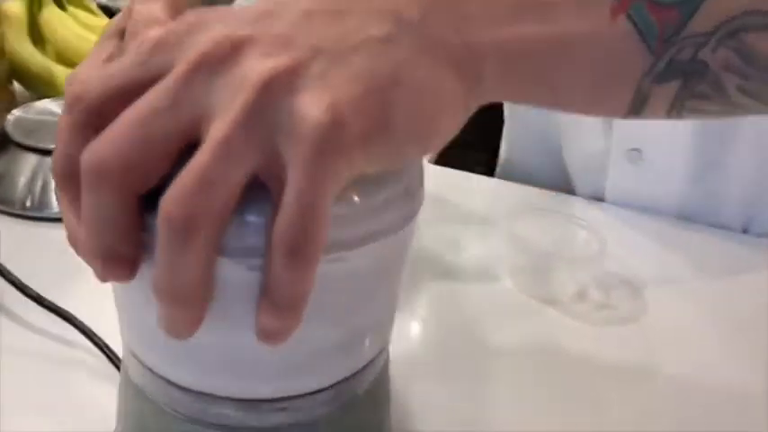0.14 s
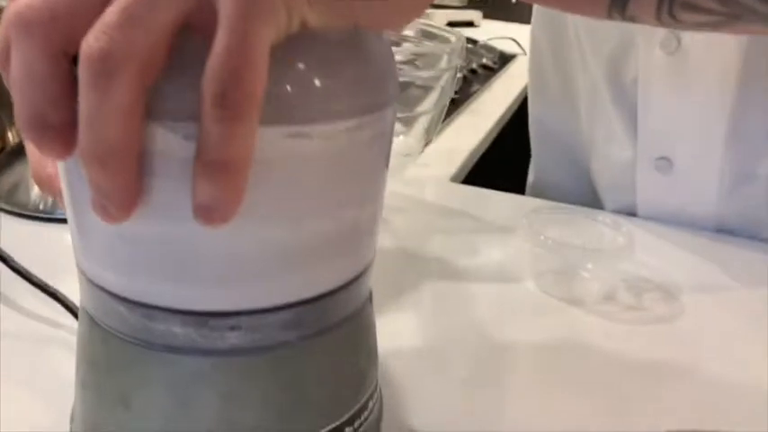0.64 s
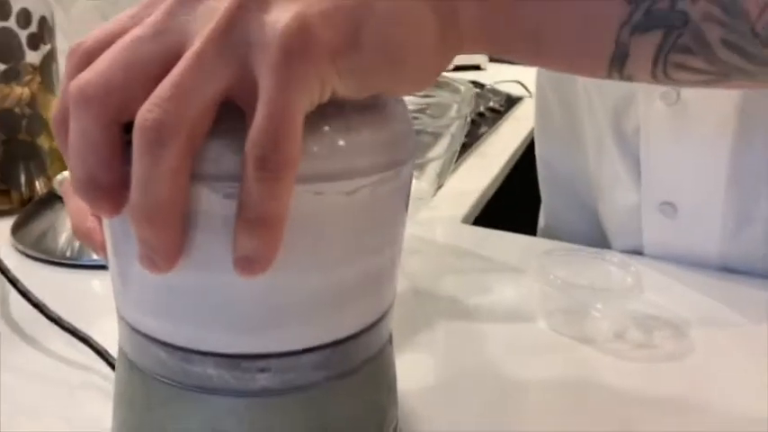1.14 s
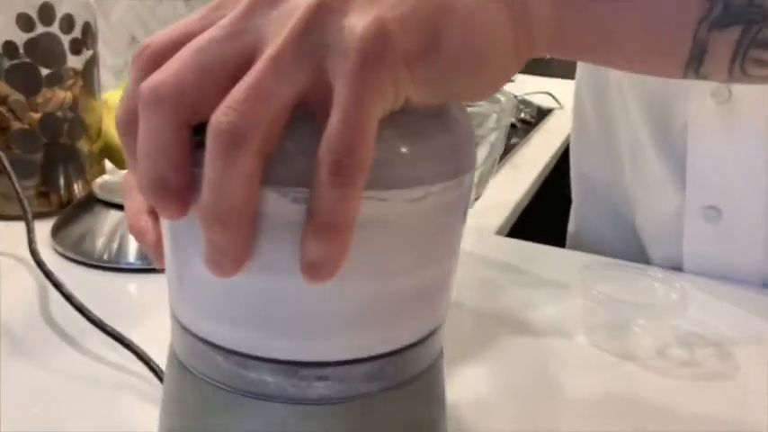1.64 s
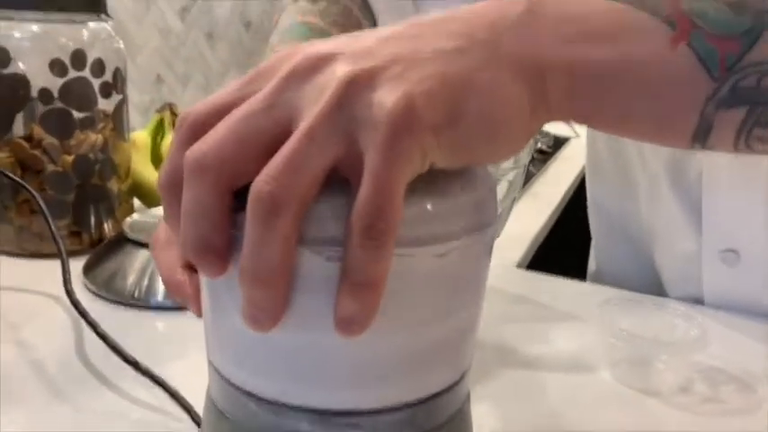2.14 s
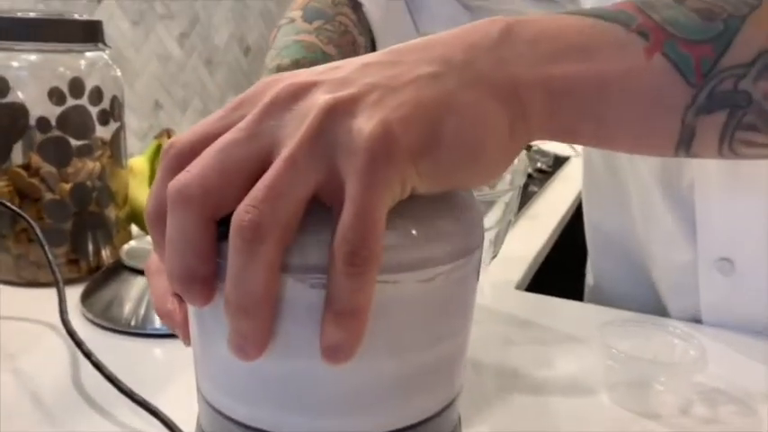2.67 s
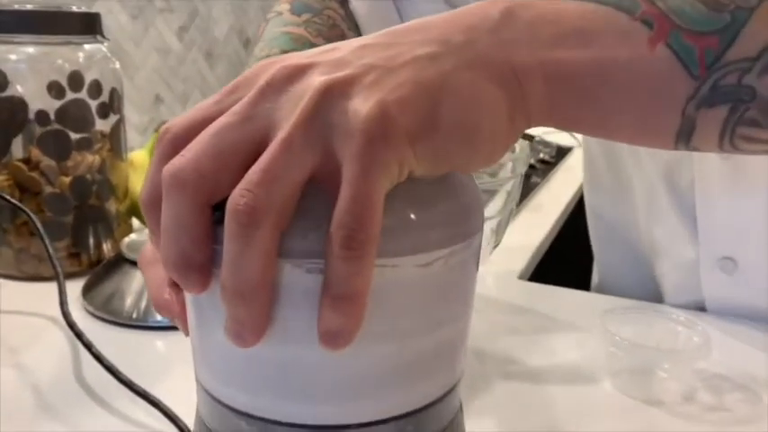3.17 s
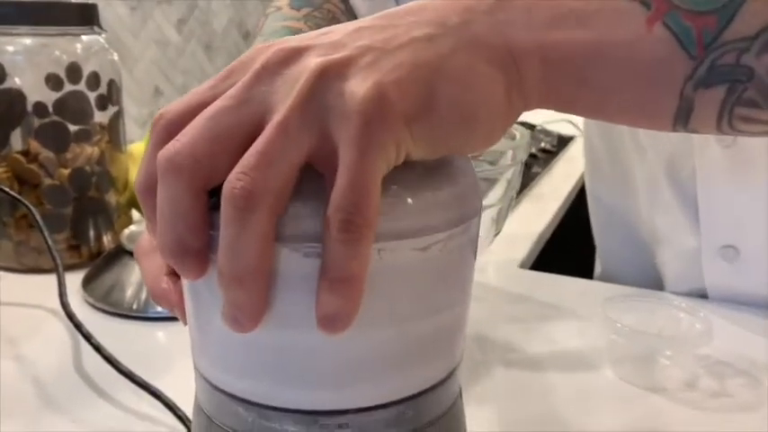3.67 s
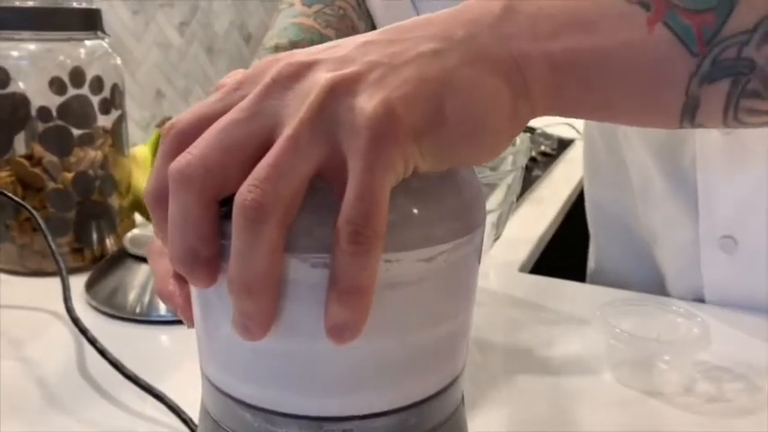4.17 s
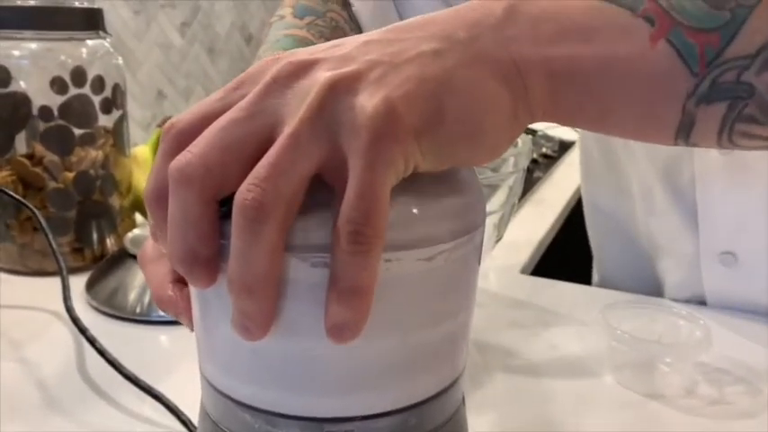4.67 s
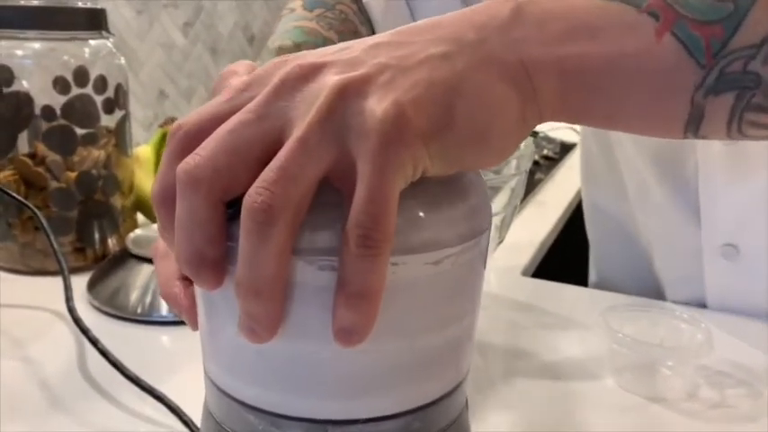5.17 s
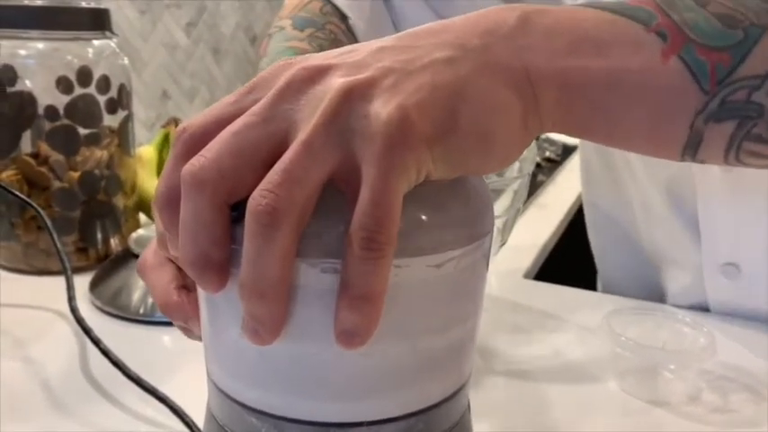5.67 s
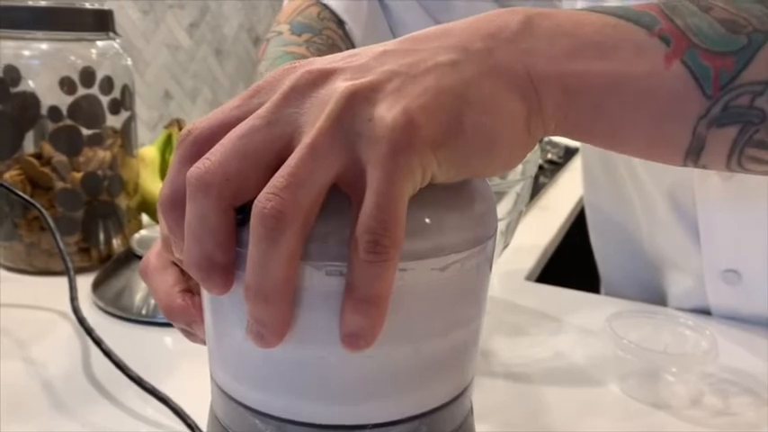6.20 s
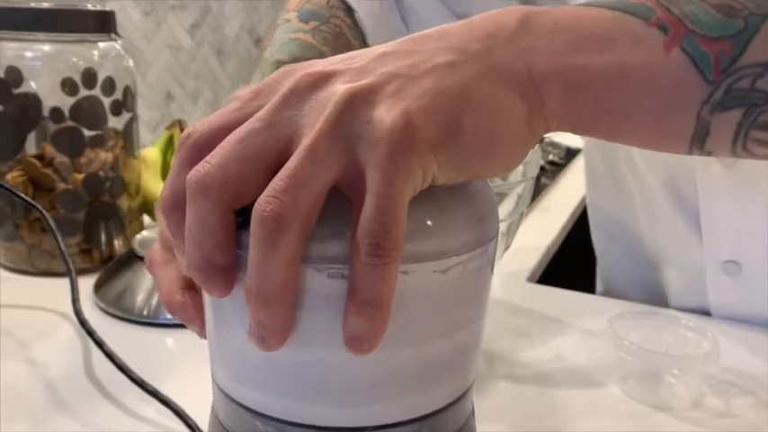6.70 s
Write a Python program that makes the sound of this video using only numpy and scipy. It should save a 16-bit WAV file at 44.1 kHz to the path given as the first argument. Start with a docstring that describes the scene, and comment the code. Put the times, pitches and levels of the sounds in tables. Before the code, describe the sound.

Close, centred sound of a small electric food chopper on a kitchen counter, with faint room air and a short bright reverberation. It starts at full speed but is let go at about 0.05 s, and the whine slides down, roughening into a coarser, duller clatter. At 0.4 s a tiny tick and near-instant spin-up begin a loud, harsh whine with gritty tooth rattle, fast fluttering and low hum, held until 1.3 s. It coasts down, then runs again from 1.7 to 2.6 s, 3.0 to 3.8 s, 4.2 to 5.0 s and 5.4 to 6.6 s, the last longest and slightly loudest. Within each run the pitch starts a little lower under the food's load, then lifts and wavers. Soft low jolts accompany the releases, strongest near 3.9 s. After 6.6 s the final glide falls away towards the end.

```python
"""A small geared food chopper, already running, is let go almost at once; five longer pulses follow.
Each press ticks and spins up, the blade works through thick food, a jolt marks the release, and it coasts down.
Tooth contact gives whine partials at the mesh rate and noisy knocks, coloured by housing resonances.
Low noise and hum shake the counter; random reflections add a short tail, over quiet kitchen air."""
import sys
import numpy as np
from scipy import signal
from scipy.fft import rfft, irfft
from scipy.io import wavfile
from scipy.ndimage import uniform_filter1d

SR = 44100
rng = np.random.default_rng(int(sys.argv[2]) if len(sys.argv) > 2 else 0)


def output_pcm(signal):
    """Save a mono or channel-first signal as 16-bit PCM at the path in sys.argv[1].

    Samples are clipped to [-1, 1] before scaling.
    """
    pcm = np.clip(np.atleast_2d(signal).T, -1, 1) * 32767
    wavfile.write(sys.argv[1], SR, np.round(pcm).astype(np.int16))


def makeup_ratio(level_db):
    """Linear amplitude ratio for a level in decibels (20 dB per factor of ten)."""
    decades = np.asarray(level_db, float) / 20
    return 10 ** decades


N = 300762
T = np.arange(N) / SR  # time of each sample, s
FULL_HZ = 2950  # nominal mesh rate at full speed
TEETH = 64  # teeth on the blade gear
EDGE_HZ = 15770  # upper edge of the sound's band
SLACK_S = 0.009  # time in which the teeth take up slack

# presses of the switch: on_s, off_s, food_drag_per_s, gear_trim_db, shake_trim_db
PRESSES = [(-0.5, 0.047, 4.4, 0, 4), (0.416, 1.337, 4.45, -0.6, 2), (1.694, 2.633, 3.53, -0.65, 0.5),
           (2.96, 3.84, 4.01, -0.3, 0), (4.199, 4.986, 3.6, -0.3, -1), (5.394, 6.628, 3.27, 0.36, -0.5)]


def evened(x):
    """Normalisation: scales to rms 1."""
    return x / np.sqrt(np.mean(x ** 2) + 1e-20)


def read(points, hz):
    """Spectral envelope: interpolates its points along a log-frequency axis."""
    f, value = np.transpose(points)
    return np.interp(np.log(hz + 1), np.log(f + 1), value)


def curve(table, column, at=T):
    """Linear interpolation: one column of a table against its first column."""
    points = np.array(table)
    return np.interp(at, points[:, 0], points[:, column])


def wander(hz):
    """Low-pass filtered chance: a smooth fluctuation of rms 1, with its corner at hz."""
    return evened(signal.lfilter(*signal.butter(2, hz, fs=SR), rng.standard_normal(N)))


def shaped_noise(shape, size, patchy_db):
    """Short-time synthesis: random spectra under shape(hz, s), levelled by frame, then given drifting patches."""
    hop = size // 4
    frames = N // hop + 5
    hz = np.fft.rfftfreq(size, 1 / SR)[:, None]
    real, imaginary, patches = rng.standard_normal((frames, len(hz), 3)).T
    patches = uniform_filter1d(patches, size // 64, 0)
    patches = evened(uniform_filter1d(patches, 2560 // hop, 1))
    gain = shape(hz, np.arange(frames) * hop / SR) * np.ones(frames)
    gain = gain / np.sqrt((gain ** 2).mean(0)) * makeup_ratio(patchy_db * patches)
    noise = signal.istft((real + 1j * imaginary) * gain, nperseg=size, noverlap=size - hop)[1]
    return evened(noise[:N])


def body(hz):
    """Modal response: gain of the housing, its broad colour and its resonances adding in power."""
    # broad colour of the housing: frequency_hz, gain_db
    broad_colour = [(400, -43), (620, -48), (850, -20), (1050, -12.5), (1800, -5), (3100, -18.5),
                    (3500, -8.5), (4600, -1.5), (5600, -3.5), (7300, -3), (9000, -3), (12500, -3),
                    (15500, -6), (17000, -1)]
    # resonances of housing and bowl: frequency_hz, width_hz, gain_db
    resonances = [(770, 32, -33), (1154, 58, -1.5), (1508, 390, -2), (2038, 51, -1), (2250, 120, -7.5),
                  (2484, 240, -5.5), (2940, 290, -2), (3205, 240, -5.5), (3918, 170, 4), (4183, 150, 3.5),
                  (5345, 90, -1), (5888, 90, 1), (6350, 870, -0.5), (8280, 450, -3), (9830, 320, 5.5),
                  (11000, 1300, -5), (14000, 540, -3.5)]
    peaks = sum(makeup_ratio(2 * db) / (1 + (2 * (hz - f) / width) ** 2) ** 2 for f, width, db in resonances)
    return np.sqrt(makeup_ratio(2 * read(broad_colour, hz)) + peaks)


def through_body(x):
    """Linear filtering: colours a sound by the housing, at unit mean power gain."""
    gain = body(np.fft.rfftfreq(N, 1 / SR))
    return irfft(rfft(x) * evened(gain), N)


def kitchen_air():
    """Stationary broadband noise: the quiet air of the kitchen."""
    # spectrum of the air: frequency_hz, relative_level_db
    air_spectrum = [(20, -35), (33, -8), (45, -3.5), (70, -27), (100, -4.5), (200, -29), (700, -18),
                    (1500, -14), (5000, -26), (9000, -40), (16000, -50)]
    return makeup_ratio(-51.5) * shaped_noise(lambda hz, s: makeup_ratio(read(air_spectrum, hz)), size=2048, patchy_db=2.5)


def kitchen(x):
    """Reverberation: sparse reflections of random sign, each band dying at its own speed."""
    # decay of the kitchen: frequency_hz, t60_s
    decay_times = [(200, 0.55), (1500, 0.25), (5000, 0.59), (14000, 0.32)]
    taps = np.zeros(SR // 2)
    at = np.arange(200, len(taps) - 20, 20)
    taps[at + rng.integers(0, 20, len(at))] = rng.choice([-1., 1.], len(at))
    hz, t, z = signal.stft(taps, SR, nperseg=256)
    fade_db = -60 * t / read(decay_times, hz)[:, None]
    tail = signal.istft(z * makeup_ratio(fade_db), SR, nperseg=256)[1]
    return signal.fftconvolve(x, tail / np.linalg.norm(tail))[:N]


def jolts():
    """Damped oscillation: the counter is pushed and swings back as the switch is let go."""
    # jolts through the counter: start_s, initial_amplitude_db, pitch_hz
    releases = [(1.31, -39, 42.92), (2.64, -42, 42.8), (3.86, -32, 37.8), (5.01, -41, 40), (6.63, -39, 40)]
    out = 0
    for start_s, db, hz in releases:
        t = np.maximum(T - start_s, 0)
        out = out + makeup_ratio(db - 60 * t / 0.14) * np.sin(2 * np.pi * hz * t)  # t60 0.14 s
    return out


def shake(mesh_hz, turns, ripple_turns):
    """Intermodulation: hum where blade turns and torque ripple mix, over a lumpy rumble of the counter."""
    # counter top shaken by the base: frequency_hz, relative_level_db
    counter_spectrum = [(20, -40), (33, -18), (45, -16.5), (75, -18), (120, -6.5), (165, -8), (210, -0.5),
                        (285, -4.5), (340, -13.5), (420, -9), (520, -16.5), (620, -28.5), (900, -26)]
    # hum in the base: times_per_blade_turn, times_torque_ripple, level_db (before fluctuation and speed)
    hum_lines = [(1, 0, -13), (1, 1, -3.5), (1, 2, -4.5), (22, -2, -15.5), (22, -1, -34), (22, 0, -9.5),
                 (25, 0, -5), (32, 0, -21.5), (40, 0, -20), (44, 0, -5.5)]
    rumble = shaped_noise(lambda hz, s: makeup_ratio(read(counter_spectrum, hz)), size=2048, patchy_db=1.4)
    hum = 0
    for k, m, db in hum_lines:
        phase = 2 * np.pi * (round(k) * turns + round(m) * ripple_turns)
        hum = hum + makeup_ratio(db + 2 * wander(6.1)) * np.cos(phase)
    return rumble + hum * (mesh_hz / FULL_HZ) ** 8  # hum rises steeply with speed


def clicks():
    """Impulsive excitation: each closing switch contact sends a short noise tick through the housing."""
    start_db, t60_s = -46, 0.024
    fade = 0
    for on, *_ in PRESSES:
        fade = fade + (T > on) * makeup_ratio(start_db - 60 * np.maximum(T - on, 0) / t60_s)
    return through_body(fade * rng.standard_normal(N))


def motor():
    """First-order dynamics: mesh rate nears the loaded speed, then drag and friction slow it; tooth load 0-1."""
    # mesh rate the powered motor can hold against the food: time_s, mesh_hz
    held_speed = [(0.0, 2670), (0.6, 2656), (0.8, 2766), (0.945, 2709), (1.115, 2883), (1.33, 2851),
                  (1.8, 2624), (1.99, 2688), (2.18, 2882), (2.38, 2966), (2.51, 2862), (2.63, 2849),
                  (3.05, 2678), (3.245, 2712), (3.33, 2853), (3.44, 2930), (3.63, 2860), (3.83, 2919),
                  (4.3, 2681), (4.52, 2700), (4.6, 2883), (4.725, 2975), (4.97, 2940), (5.5, 2700),
                  (5.7, 2710), (5.775, 2870), (5.86, 2924), (5.95, 2973), (6.365, 2965), (6.52, 2940),
                  (6.625, 2987)]
    spin_up_s, grip_s, let_go_s = 0.041, 0.008, 0.035  # time constants: motor, teeth loading, unloading
    friction_hz = 500.5  # dry friction slows like the drag on this much more speed
    hold_hz = curve(held_speed, column=1)
    mesh_hz = np.full(N, held_speed[0][1], float)
    load = np.zeros(N)
    for on, off, drag, *_ in PRESSES:
        since, after = np.maximum(T - on, 0), np.maximum(T - off, 0)
        up = hold_hz + (np.interp(on, T, mesh_hz) - hold_hz) * np.exp(-since / spin_up_s)
        down = (np.interp(off, T, up) + friction_hz) * np.exp(-drag * after) - friction_hz
        mesh_hz = np.where(T < on, mesh_hz, np.where(T < off, up, np.maximum(down, 60)))
        gripping = 1 - np.exp(-np.maximum(since - SLACK_S, 0) / grip_s)
        load = np.maximum(load, gripping * np.exp(-after / let_go_s))
    return mesh_hz, load


def level(mesh_hz, load, column):
    """Load-dependent radiation: dB between two speed laws; coasting gears answer a change of speed late."""
    # levels under power: mesh_hz, gear_level_db, shake_level_db, whine_re_rattle_db (before trims)
    powered_law = [(300, -75, -32, -10), (980, -32, -36, -2), (1510, -28.5, -37, -2.5),
                   (2020, -24.5, -38, -4), (2580, -23, -44.5, -1.2), (2700, -21.5, -42, -2.5),
                   (3015, -20.5, -45, -1.45)]
    # levels while coasting: mesh_hz, gear_level_db, shake_level_db, whine_re_rattle_db (before trims)
    coasting_law = [(300, -62, -67, -5), (450, -49, -61, -8), (670, -42.5, -66.5, -7),
                    (980, -34.5, -57.5, -4.5), (1540, -30.5, -51.5, -5), (2220, -26, -53, -3.5),
                    (2900, -23.5, -43, 1)]
    powered_db = curve(powered_law, column, mesh_hz)
    coasting_db = curve(coasting_law, column, np.interp(T - SLACK_S, T, mesh_hz))
    return load * powered_db + (1 - load) * coasting_db


def per_press(column):
    """Sample and hold: a column of the press table, kept until the next press."""
    table = np.array(PRESSES)
    return table[np.searchsorted(table[:, 0], T) - 1, column]


def gear_runout(turns):
    """Periodic modulation: run-out of the blade gear repeats with every turn, around a mean of 1."""
    # run-out of the blade gear: times_per_turn, depth (ratio), phase_turns
    runout_terms = [(1, 0.51, 0.043), (2, 0.73, 0.31), (3, 0.58, 0.75), (5, 0.85, 0.51)]
    return 1 + sum(depth * np.cos(2 * np.pi * (round(k) * turns + phase)) for k, depth, phase in runout_terms)


def rattle(mesh_hz, turns, runout, ripple):
    """Impact noise: slow tooth knocks last longer, so their treble falls as the gear coasts down."""
    def shape(hz, s):
        now_hz = np.interp(s, T, mesh_hz)
        treble_loss = (1 + (hz / (4.9 * now_hz + 4500)) ** 4) ** -.8
        brightness = (1 + hz / 4000) ** (0.34 * now_hz / FULL_HZ)
        return body(hz) * treble_loss * brightness
    slack = 1 + 3.3 * np.clip(1 - mesh_hz / FULL_HZ, 0, 1)  # slower gears clatter more coarsely
    knocks = makeup_ratio(slack * (0.74 * wander(730) + 0.52 * wander(62)))  # some teeth land harder
    modulation = 1 + 0.017 * (runout - 1) + 0.015 * ripple
    loose = shaped_noise(shape, size=512, patchy_db=1.0) * knocks * modulation
    flaws = signal.resample(rng.standard_normal(256), 4096)  # tooth flaws, met again every turn
    place = turns + 0.0057 * wander(11.1)
    repeated = np.interp(place % 1, np.linspace(0, 1, len(flaws)), flaws)
    return evened(loose) + makeup_ratio(-9.5) * evened(through_body(repeated))


def whine(mesh_hz, turns, runout, share_db):
    """Gear-mesh harmonics: uneven teeth and run-out spread them, and resonances pick out the sidebands."""
    # partials: mesh_multiple, level_db (before fluctuation), frequency_wander_hz, gain_db_per_octave_slower
    mesh_partials = [(1, -3.5, 40.3, 6), (2, -5.5, 72, 6.5), (3, -8, 110, 1.5), (4, -6.5, 150, -3),
                     (5, -8, 200, -3), (6, -11, 200, -0.5)]
    breakup_db, breakup_hz = 4.5, 35  # slow gears touch unevenly, so the glides come in patches
    teeth = TEETH * turns + 0.14 * np.sin(2 * np.pi * turns)  # an off-centre gear hurries and lags each turn
    pace = mesh_hz / FULL_HZ
    out = 0
    for k, (_, db, wander_hz, slow_db) in enumerate(mesh_partials, 1):
        slip = np.cumsum(wander_hz * wander(147.03) * pace ** 0.297) / SR
        patchy_db = breakup_db * np.sqrt(np.clip(1.05 - pace, 0, .4)) * (wander(breakup_hz) - .7)
        level_db = db - slow_db * np.log2(np.maximum(pace, .28)) + 3 * wander(230) + patchy_db
        in_band = k * mesh_hz < EDGE_HZ
        out = out + makeup_ratio(level_db) * np.cos(2 * np.pi * (k * teeth + slip)) * in_band
    throb = 1 + (evened(runout) - 1) * np.clip(pace, 0, 1) ** 0.4  # run-out bites harder at speed
    return through_body(out * makeup_ratio(share_db) * throb)


def scene():
    """Superposition: gears, counter and switch, with their room tail and air, alike in both channels."""
    mesh_hz, load = motor()
    turns = np.cumsum(mesh_hz / TEETH) / SR
    ripple_turns = 120 * T  # torque ripple in Hz, twice the mains frequency
    runout = gear_runout(turns)
    ripple = np.cos(2 * np.pi * ripple_turns) * np.clip(mesh_hz / 2500, 0, 1) ** 4  # fades at low speed
    tone = whine(mesh_hz, turns, runout, level(mesh_hz, load, column=3))
    gears = tone * (1 + 0.075 * ripple) + makeup_ratio(-2.5) * rattle(mesh_hz, turns, runout, ripple)
    # lumps of food load the gears and rock the base
    gear_db = level(mesh_hz, load, column=1) + per_press(column=3) + 0.4 * wander(10)
    shake_db = level(mesh_hz, load, column=2) + per_press(column=4) + 2 * wander(10.4)
    counter = shake(mesh_hz, turns, ripple_turns) * makeup_ratio(shake_db)
    chopper = gears * makeup_ratio(gear_db) + counter + jolts() + clicks()
    mono = chopper + makeup_ratio(-10.5) * kitchen(chopper) + kitchen_air()
    return np.array([mono, mono])


def top_cut(x):
    """Nothing passes above the cut-off."""
    return signal.sosfilt(signal.butter(12, 17080, fs=SR, output="sos"), x)


def record(dry):
    """Band limiting: a steep linear-phase low-pass finishes the mix."""
    lowpass = signal.firwin(1023, EDGE_HZ, window=("kaiser", 9), fs=SR)
    limited = signal.oaconvolve(dry, lowpass[None], "same")
    return top_cut(limited)


dry = scene()
out = record(dry)
output_pcm(out)
```